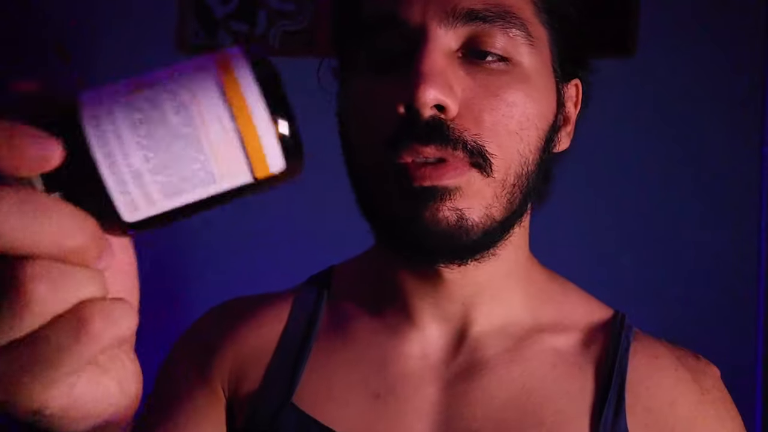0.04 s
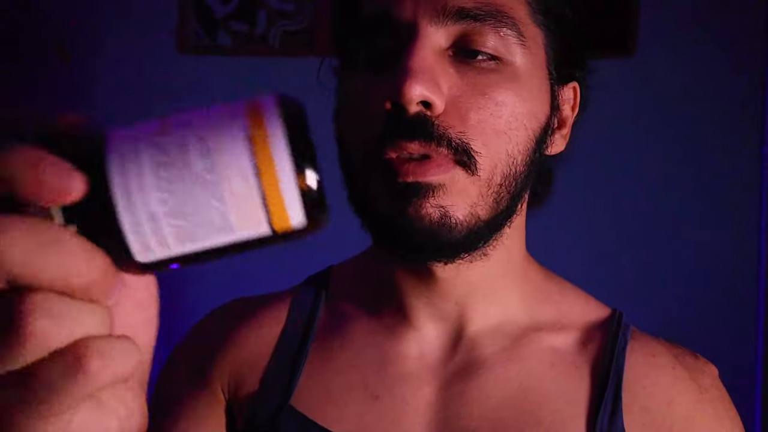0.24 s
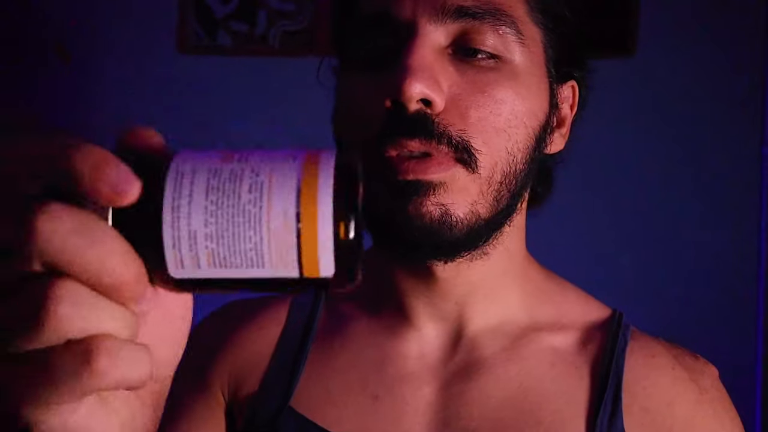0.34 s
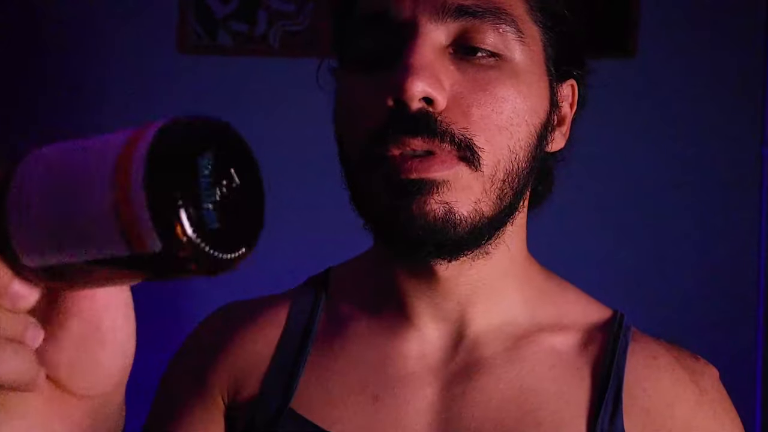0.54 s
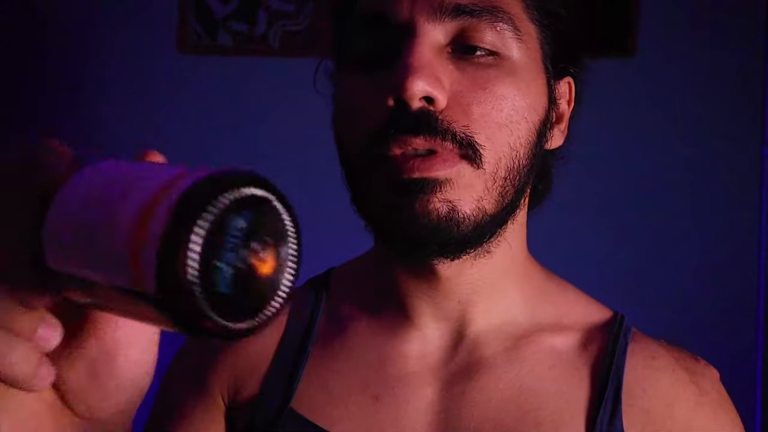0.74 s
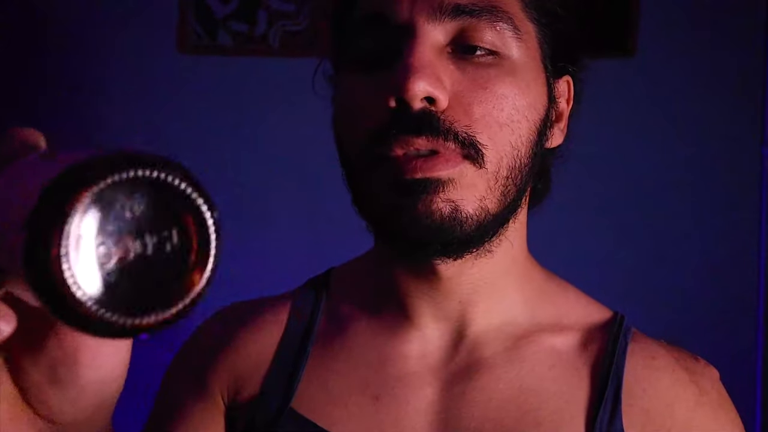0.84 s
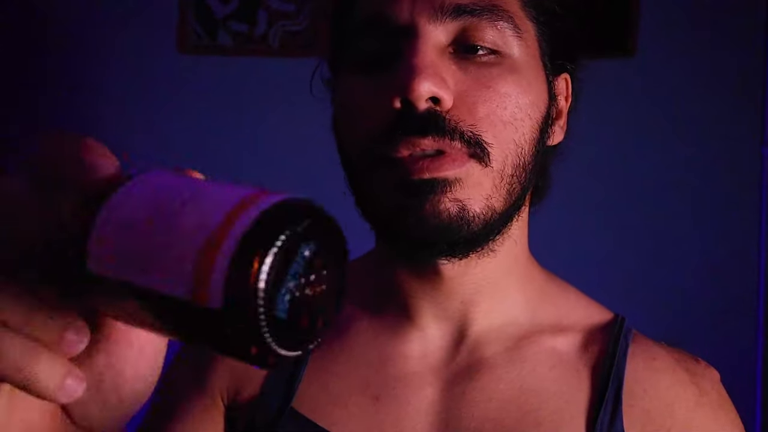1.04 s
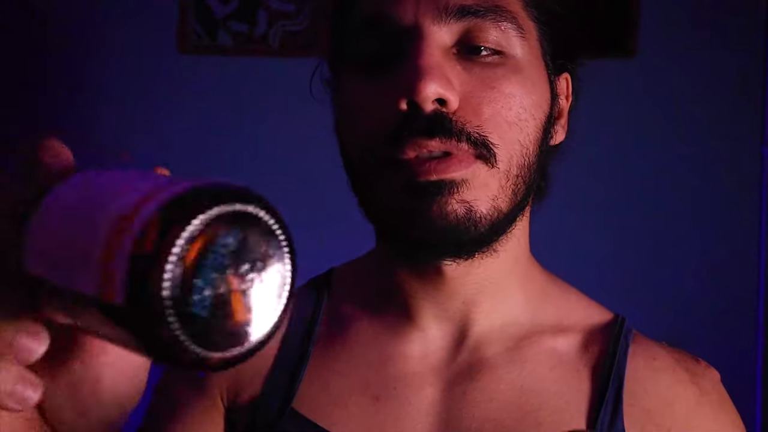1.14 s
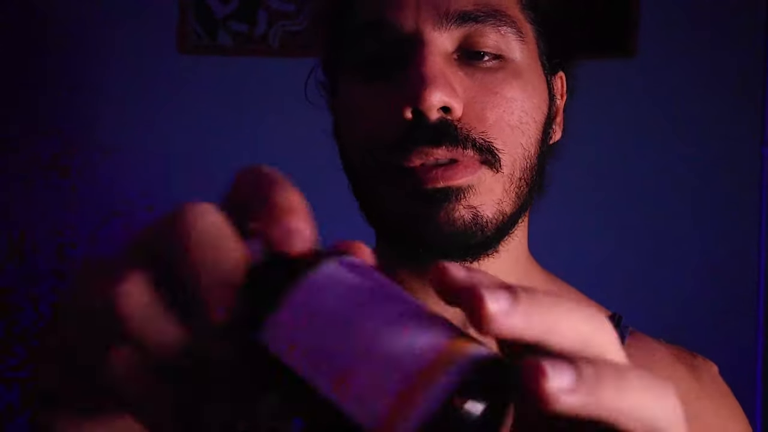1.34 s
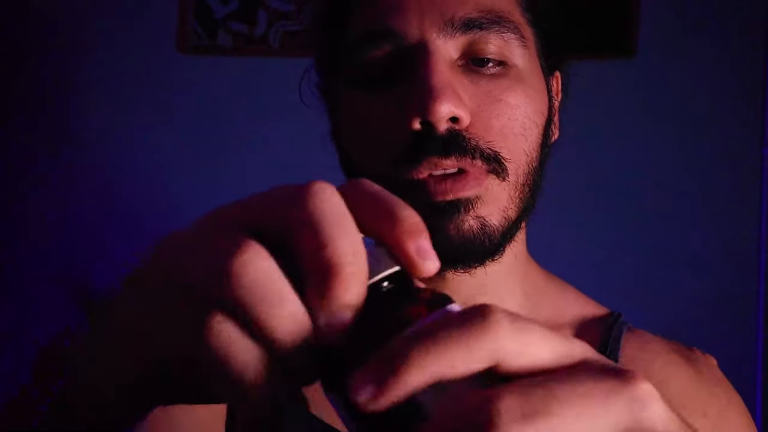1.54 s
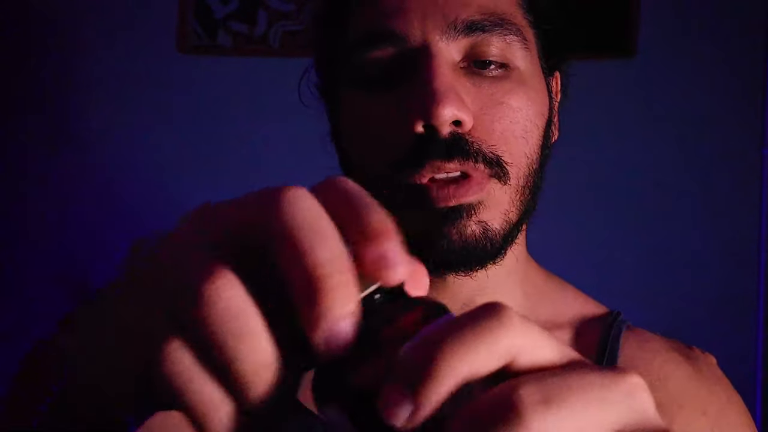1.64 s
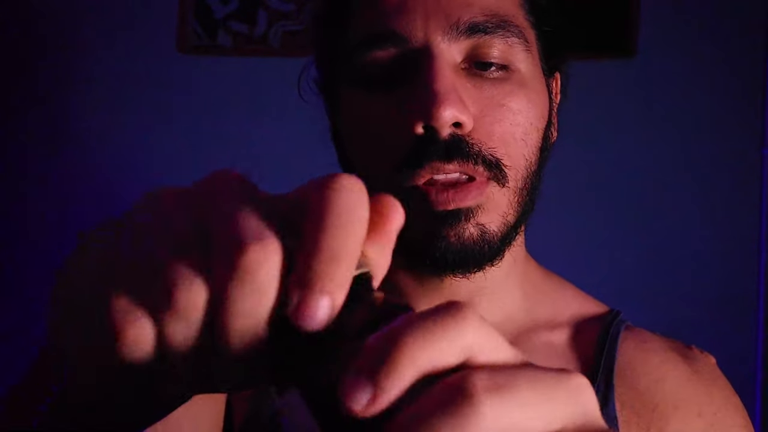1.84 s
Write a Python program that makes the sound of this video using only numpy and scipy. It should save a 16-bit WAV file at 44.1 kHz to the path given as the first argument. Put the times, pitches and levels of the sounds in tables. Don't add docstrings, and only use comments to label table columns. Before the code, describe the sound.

A small glass bottle of pills is tipped and turned, contents tumbling with hollow knocks and clinks

```python
import sys
import numpy as np
from scipy import signal
from scipy.fft import rfft, irfft
from scipy.io import wavfile

SR = 44100
rng = np.random.default_rng(int(sys.argv[2]) if len(sys.argv) > 2 else 0)


def decibels_to_gain(level_db):
    exponent = np.asarray(level_db, float) / 20
    return 10 ** exponent


def store_wav(level_fs):
    pcm = np.round(np.clip(np.atleast_2d(level_fs), -1, 1) * 32767)
    wavfile.write(sys.argv[1], SR, pcm.T.astype(np.int16))


N = 83790
T = np.arange(N) / SR


def evened(x):
    return x / np.sqrt(np.mean(x ** 2) + 1e-20)


def read(points, hz):
    f, value = np.transpose(points)
    return np.interp(np.log(hz + 1), np.log(f + 1), value)


def coloured(x, table):
    return irfft(rfft(x) * decibels_to_gain(read(table, np.fft.rfftfreq(N, 1 / SR))), N)


def hiss(table, same):
    a, b = rng.standard_normal((2, N))
    other = same * a + np.sqrt(1 - min(same, 1) ** 2) * b
    return evened(coloured(np.array([a, other]), table))


def decay(t, t60):
    return decibels_to_gain(-60 * t / t60)


def ring(hz, t60, count=4000):
    t = np.arange(count) / SR
    rise_s = .0003
    return (1 - np.exp(-t / rise_s)) * decay(t, t60) * np.sin(2 * np.pi * hz * t)


def train(times, sizes):
    out = np.zeros(N)
    at = np.round(np.asarray(times) * SR).astype(int)
    np.add.at(out, np.clip(at, 0, N - 1), sizes)
    return out


# hz, level_db
ROOM_SPECTRUM = [(300, -15.5), (800, -0.5), (3000, -13.5), (9000, -14.5), (12000, -22), (16000, -30)]


def room():
    return decibels_to_gain(-70) * hiss(ROOM_SPECTRUM, same=0.13)


# hz, level_db
GRIP_SPECTRUM = [(20, -16), (40, -6.5), (65, 4.5), (130, -5.5), (340, -13.5), (450, -17), (900, -71.5)]
# centre_s, level_db
GRIP_SHIFTS = [
    (.464, -47),
    (.682, -51),
    (.942, -57),
    (1.3, -48.5),
    (1.415, -50.5),
    (1.514, -43.5),
    (1.83, -56.5),
]


def hands():
    shift_s, thump_hz, steady_db, rustle_db = 0.025, 66.6, -57.5, -5.5
    swells = np.zeros(N)
    for s, db in GRIP_SHIFTS:
        swells += decibels_to_gain(db) * np.exp(-.5 * ((T - s) / shift_s) ** 2)
    thump = swells * np.sin(2 * np.pi * thump_hz * T)
    rumble = (decibels_to_gain(steady_db) + decibels_to_gain(rustle_db) * swells) * hiss(GRIP_SPECTRUM, same=0.72)
    return (rumble + thump) * decibels_to_gain([[1], [-1]])


# start_s, length_s, rattle_db, glass_share_db, pitch_hz
HEAP_SLIDES = [(-.01, 0.082, -51.5, -19, 1226), (0.176, 0.016, -57, 11, 2070),
               (0.202, 0.15, -29.5, -7, 2110), (0.371, 0.15, -33, 0, 1493), (0.535, 0.038, -48, 1.5, 1540),
               (0.571, 0.25, -41.5, -4, 1820), (0.701, 0.16, -37, -5.5, 1410), (0.878, 0.04, -48, -4, 1720),
               (0.899, 0.13, -47.5, 1.5, 1580), (1.048, 0.13, -45, -13.5, 1344),
               (1.239, 0.095, -41.5, 5, 1670), (1.336, 0.13, -45.5, -4, 1310),
               (1.403, 0.062, -40, 0.5, 1450), (1.449, 0.15, -37.5, 0, 1545), (1.589, 0.14, -53, -6, 1517)]


def heap():
    swell_share, edge_db, still_db = 0.32, -15.5, -72
    start, length, db, glass_db, hz = np.transpose(HEAP_SLIDES)[:, :, None]
    u = (T - start) / length
    away = np.where(u < swell_share, 1 - u / swell_share, (u - swell_share) / (1 - swell_share))
    power = decibels_to_gain(2 * (db + edge_db * np.minimum(away, 4) ** 2))
    still = decibels_to_gain(2 * still_db)
    total = power.sum(axis=0) + still
    pitch = ((power * hz).sum(axis=0) + still * hz.mean()) / total
    glass_power = (power * decibels_to_gain(2 * glass_db)).sum(axis=0)
    return np.sqrt(total), np.sqrt(glass_power), pitch


def chance(per_s, spread_db):
    gap, strength, sign, luck = rng.random((3000, 4)).T
    times = np.cumsum(-np.log(1 - gap)) / per_s
    keep = times < T[-1]
    sizes = decibels_to_gain(spread_db * np.minimum(-np.log(1 - strength), 3.0)) * np.sign(sign - .5)
    return times[keep], sizes[keep], (2 * luck - 1)[keep]


def rattle():
    low_gain, glass_gain, pitch = heap()

    knock_per_s, knock_t60, pitch_spread = 1000, 0.0088, 0.26
    s, size, luck = chance(knock_per_s, spread_db=3.5)
    at = (s * SR).astype(int)
    scale = np.sqrt(np.mean(size ** 2) * knock_per_s * knock_t60 / 20)
    hz = pitch[at] * np.exp(2 * pitch_spread * luck)
    low = knocks(s, size * low_gain[at] / scale, hz, tick_db=2.5, note_t60=knock_t60)

    clink_per_s = 500
    s, size, luck = chance(clink_per_s, spread_db=6.5)
    scale = np.sqrt(np.mean(size ** 2) * clink_per_s / 700)
    size = size * glass_gain[(s * SR).astype(int)] / scale
    return low + clinks(s, size * decibels_to_gain(3.7 * luck), size * decibels_to_gain(-3.5 - 3.5 * luck), tick_db=4)


# hz, level_db
CONTACT_SPECTRUM = [(150, 2.5), (500, -9.5), (1200, 4), (2200, 6.5), (4500, -3), (8000, 4), (12000, -13.5)]


def tick(clicks):
    scrape_t60 = .004
    half = np.log(decibels_to_gain(read(CONTACT_SPECTRUM, np.fft.rfftfreq(1024, 1 / SR))))
    whole = np.r_[half, half[-2:0:-1]]
    shape = np.fft.ifft(np.exp(np.conj(signal.hilbert(whole)))).real[:512]
    kind, out = rng.integers(0, 12, size=N), np.zeros(N)
    for k, grit in enumerate(rng.standard_normal((12, 256))):
        contact = np.convolve(shape, grit * decay(np.arange(256) / SR, scrape_t60))
        out += signal.oaconvolve(clicks * (kind == k), contact / abs(contact).max())[:N]
    return out


# hz, level_db, t60_s
BOTTLE_MODES = [(1669, -17.5, 0.077), (1780, -33, 0.17), (2015, -8, 0.081), (2240, -10.5, 0.039),
                (2398, -0.5, 0.013), (2713, 7, 0.0091)]


def knocks(times, sizes, pitches, tick_db, note_t60):
    rise_s, modes_db, reach, count = .0008, -14, 0.23, 2400
    out = decibels_to_gain(tick_db) * tick(train(times, sizes))
    onset = 1 - np.exp(-np.arange(count) / SR / rise_s)
    for s, size, hz in zip(times, sizes, pitches):
        part = out[round(s * SR):][:count]
        part += (size * onset * ring(hz, note_t60, count))[:len(part)]
    luck = np.sign(rng.standard_normal((len(times), len(BOTTLE_MODES))))
    for k, (hz, db, t60) in enumerate(BOTTLE_MODES):
        near = np.exp(-.5 * (np.log(pitches / hz) / reach) ** 2) * (1 + .5 * luck[:, k])
        out += signal.oaconvolve(train(times, sizes * near), decibels_to_gain(db + modes_db) * ring(hz, t60))[:N]
    return out


PILL_KNOCKS = [(0.2186, -16, 2570), (0.225, -7.5, 2300), (0.227, -13.5, 2120), (0.232, -10, 2310),
               (0.234, -16, 1910), (0.2392, -16, 2600), (0.243, -8.5, 2290), (0.2493, -3, 2275),
               (0.2571, -7.5, 2100), (0.2597, -28.5, 2240), (0.2647, -10, 2330), (0.2746, -18.5, 2550),
               (0.2809, -22, 2300), (0.2859, -20, 2460), (0.288, -10.5, 2040), (0.3003, -13.5, 2080),
               (0.3512, -15.5, 2120), (0.3815, -32, 2080), (0.388, -23, 2295), (0.394, -18.5, 1860),
               (0.3979, -19, 1640), (0.4029, -17.5, 2080), (0.412, -30.5, 1910), (0.417, -29, 2330),
               (0.431, -24, 1850), (0.436, -20, 1610), (0.4409, -28, 1970), (0.444, -42, 2040),
               (0.4478, -24, 1850), (0.4529, -22.5, 1660), (0.4603, -34, 2030), (0.4651, -25.5, 1680),
               (0.4747, -24, 1660), (0.4817, -25.5, 2010), (0.489, -20, 1530), (0.4993, -25.5, 2120),
               (0.6564, -14.5, 2250), (0.6595, -13, 2120), (0.662, -18.5, 1790), (0.675, -9, 2240),
                  (0.6988, -23, 2090), (0.738, -21, 1710), (0.756, -22, 1790), (0.8898, -32, 2160),
                  (1.095, -35, 1580), (1.289, -15.5, 2240), (1.2983, -22, 2050), (1.5036, -30, 2440),
               (.008, -36.5, 1400),
    (.1196, -45, 1120),
    (0.1296, -45.5, 1410),
    (.6163, -26, 1660),
    (1.3201, -31, 2140),
    (1.38, -34, 1390),
    (1.4717, -24, 1100),
    (1.621, -36, 1280),
]


def pill_knocks():
    s, db, hz = np.transpose(PILL_KNOCKS)
    return knocks(s, decibels_to_gain(db + 4), hz, tick_db=-11, note_t60=0.0083)


# hz; then level_db, t60_s
LOWER_GLASS_HZ = [6590, 6700, 6775, 6860]
LOWER_GLASS = [(-4.5, 0.016), (-2, 0.026), (-2.5, 0.022), (-4.5, 0.016)]
# hz; then level_db, t60_s
UPPER_GLASS_HZ = [8560, 8655, 8735, 9880, 13520, 13620]
UPPER_GLASS = [(-12, .025), (-1.5, .035), (-5.5, .035), (-16.5, .03), (12, 0.066), (1, .03)]


def clinks(times, lower, upper, tick_db):
    gripped_s, gripped_t60_share = 1.3, 0.49
    out = decibels_to_gain(tick_db) * tick(train(times, np.hypot(lower, upper)))
    modes = LOWER_GLASS + UPPER_GLASS
    luck, side = rng.uniform(.5, 1, (len(times), len(modes), 2)).T
    for k, (hz, (db, t60)) in enumerate(zip(LOWER_GLASS_HZ + UPPER_GLASS_HZ, modes)):
        struck = lower if k < len(LOWER_GLASS) else upper
        size = struck * luck[k] * np.sign(side[k] - .65)
        for held, share in ((times < gripped_s, 1), (times >= gripped_s, gripped_t60_share)):
            out += signal.oaconvolve(train(times, size * held), decibels_to_gain(db) * ring(hz, t60 * share))[:N]
    return out


# start_s, lower_modes_db, upper_modes_db
GLASS_CLINKS = [(0.024, -40, -34.5), (0.0291, -44, -31.5), (0.1917, -28, -49.5), (0.2279, -14, -44.5),
                (0.2356, -14, -31), (0.2441, -23.5, -48.5), (0.2528, -9, -28.5), (0.256, -17.5, -22),
                (0.2628, -16, -41), (0.2732, -13, -30.5), (0.2811, -16.5, -32.5), (0.3501, -20, -16),
                (0.3815, -18, -16.5), (0.396, -30.5, -24), (0.3994, -33, -16.5), (0.4129, -22, -22.5),
                (0.4314, -24, -21), (0.4407, -18, -20), (0.4487, -26, -49), (0.454, -17, -9.5),
                (0.4614, -10.5, -22.5), (0.4688, -38, -16.5), (0.4785, -21, -18.5), (0.4997, -23, -53.5),
                (0.5873, -34, -55), (0.6, -34.5, -34), (0.6236, -30.5, -44),
                (0.6411, -33, -41), (0.6483, -38, -32), (0.6562, -34, -41), (0.6637, -23.5, -43),
                  (0.6763, -30.5, -51), (0.69, -28, -54), (0.7034, -29, -52), (0.7254, -19.5, -32),
                  (0.7311, -23.5, -42), (0.7336, -30, -47), (0.7376, -29, -27.5), (0.7461, -34, -34),
                  (0.7519, -28, -32), (0.7574, -27, -54), (0.7791, -33, -35), (0.7995, -25.5, -45),
                  (0.8085, -34, -50), (0.8245, -30, -37.5), (0.9235, -25, -26), (0.9309, -27.5, -43),
                  (0.9422, -41, -31), (0.9658, -27, -33), (0.9704, -27, -28), (1.0897, -38, -37.5),
                  (1.1048, -37, -58), (1.1105, -28, -36), (1.1354, -42, -39.5), (1.2425, -32.5, -29.5),
                  (1.2508, -25, -34), (1.2749, -21, -46), (1.2784, -15.5, -36), (1.2899, -38, -54),
                  (1.2928, -35, -44), (1.4133, -19.5, -47), (1.4192, -25, -52), (1.4426, -30, -32),
                  (1.4742, -19.5, -37), (1.4853, -20, -23.5), (1.4878, -18, -47), (1.4918, -19.5, -20),
                  (1.4985, -25, -28), (1.503, -30, -45), (1.5061, -41, -52), (1.5091, -52, -34),
                  (1.5142, -29, -42), (1.5336, -33.5, -36), (1.5598, -25, -40), (1.5786, -29.5, -37)]


def glass_clinks():
    s, lower_db, upper_db = np.transpose(GLASS_CLINKS)
    return clinks(s, decibels_to_gain(lower_db + 2.5), decibels_to_gain(upper_db + 2.5), tick_db=-6.5)


# start_s, level_db, pitch_hz
NECK_NOTES = [
    (0.2738, -19, 2240),
    (.6765, -21, 1975),
    (1.49, -33, 1029),
    (1.5139, -28, 1780),
    (1.539, -30, 1762),
    (1.592, -38, 1782),
]


def neck_notes():
    s, db, hz = np.transpose(NECK_NOTES)
    return knocks(s, decibels_to_gain(db), hz, tick_db=-11, note_t60=.075)


# start_s, level_db, top_hz
EDGE_SNAPS = [(0.3516, -13, 15900), (0.3825, -17, 16000), (0.6243, -24.5, 11000), (0.7225, -20.5, 9900),
              (0.7254, -16, 11000), (0.7376, -24, 10900), (0.9706, -27, 9800), (1.4848, -20, 9500),
              (1.4883, -13, 9500), (1.4984, -21.5, 9500), (1.5594, -18.5, 11900), (1.5789, -24, 11900),
              (1.668, -29.5, 13300)]


def snaps():
    snap_t60, softness = 0.0026, 0.29
    out, t = np.zeros(N), np.arange(256) / SR
    for (s, db, top_hz), grit in zip(EDGE_SNAPS, rng.standard_normal((len(EDGE_SNAPS), 256))):
        poles = np.convolve([1, -softness], [1, -.9])
        burst = signal.lfilter([1, 1, -1, -1], poles, grit * decay(t, snap_t60))
        burst = signal.sosfilt(signal.butter(6, top_hz, fs=SR, output="sos"), burst)
        out[round(s * SR):][:256] += decibels_to_gain(db) * burst / abs(burst).max()
    return out


# hz, level_db
BOTTLE_COLOUR = [(60, -31.5), (250, 1), (9000, -2.5), (10500, -7.5), (12500, -20.5), (14200, -44.5),
                 (16000, -51)]
# time_s, turned_share
BOTTLE_TURN = [
    (1.0, 0),
    (1.3, .45),
    (1.43, .6),
    (1.52, 1),
]
# hz, before_db, after_db
LEFT_LEAN = [(700, 1.5, -3), (1300, 3.5, -2), (2300, 3.5, -1), (4500, 4, 2), (6700, 10, -5), (8650, 7, 3),
             (13500, 2, 0)]
# hz, before_rad, after_rad
LEFT_LEAD = [(1300, .15, .1), (2300, .7, .25), (3500, -.3, -1.0), (5500, 1.7, .5), (6700, 2.5, .3),
             (8650, 5.5, 5.5), (10300, 7.5, 4.5), (13500, 8.0, 8.2)]


def turned(table, hz, turn):
    table = np.array(table)
    before, after = read(table[:, :2], hz)[:, None], read(table[:, ::2], hz)[:, None]
    return before * (1 - turn) + after * turn


def wall_echoes(x):
    walls_t60, first_s = .1, .002
    t = np.arange(SR // 3) / SR
    tail = rng.standard_normal((2, len(t))) * decay(t, walls_t60) * (t > first_s)
    return signal.fftconvolve(x[None], tail / np.linalg.norm(tail[0]), axes=1)[:, :N]


def microphones(bottle):
    left = coloured(bottle, BOTTLE_COLOUR) + snaps()
    hz, s, z = signal.stft(left, SR, nperseg=256)
    turn = np.interp(s, *np.transpose(BOTTLE_TURN))
    lean_db, lead = turned(LEFT_LEAN, hz, turn), turned(LEFT_LEAD, hz, turn)
    right = signal.istft(z * decibels_to_gain(-lean_db) * np.exp(-1j * lead), SR, nperseg=256)[1][:N]
    direct_db = 2.0 - 3.34 * np.interp(T, *np.transpose(BOTTLE_TURN))
    return decibels_to_gain(direct_db) * np.array([left, right]) + decibels_to_gain(-8.5) * wall_echoes(left)


def scene():
    bottle = pill_knocks() + neck_notes() + glass_clinks() + rattle()
    return microphones(bottle) + hands() + room()


def roll_off(x):
    return signal.sosfilt(signal.butter(12, 16650, fs=SR, output="sos"), x)


def record(dry):
    lowpass = signal.firwin(255, 16500, window=("kaiser", 9), fs=SR)
    mix = signal.oaconvolve(dry, lowpass[None], "same")
    return roll_off(mix)


dry = scene()
out = record(dry)
store_wav(out)
```